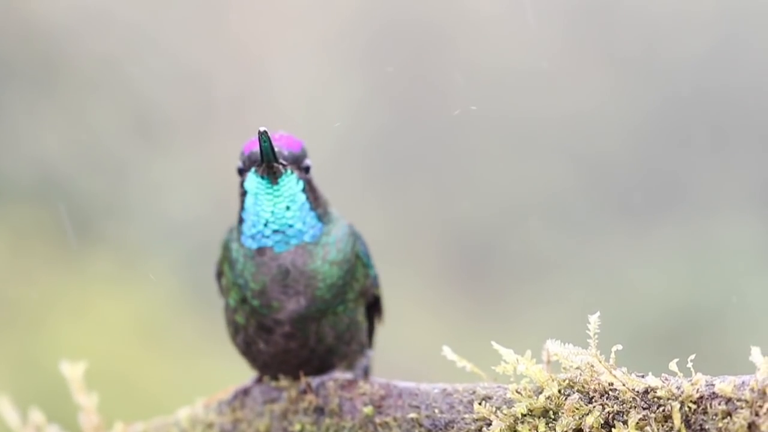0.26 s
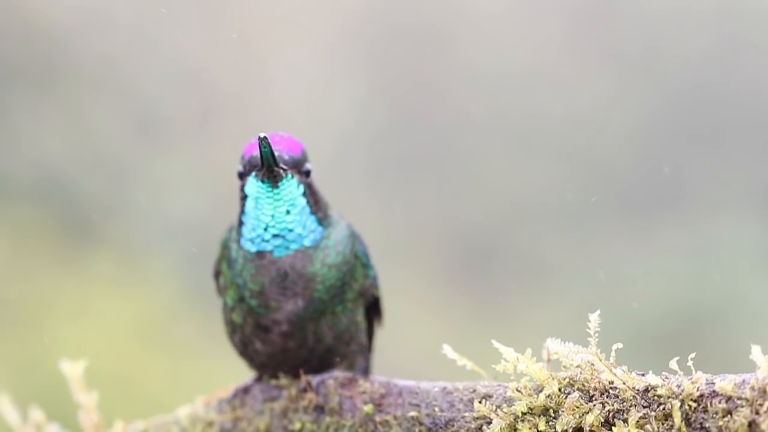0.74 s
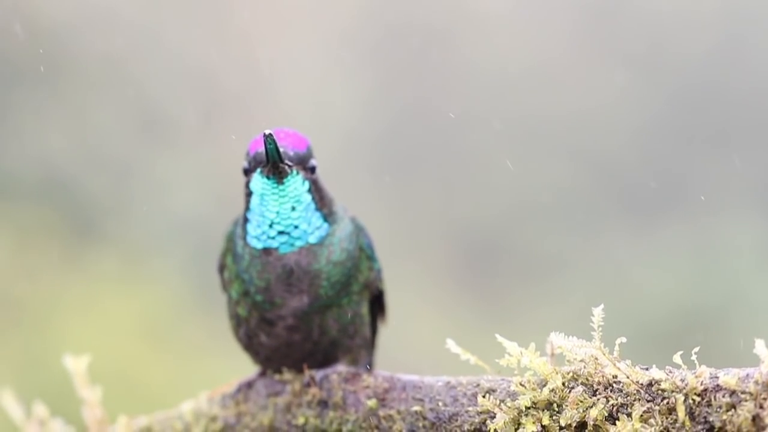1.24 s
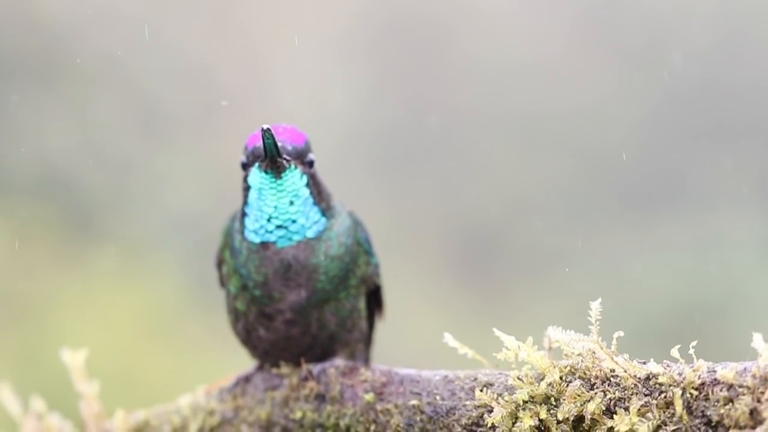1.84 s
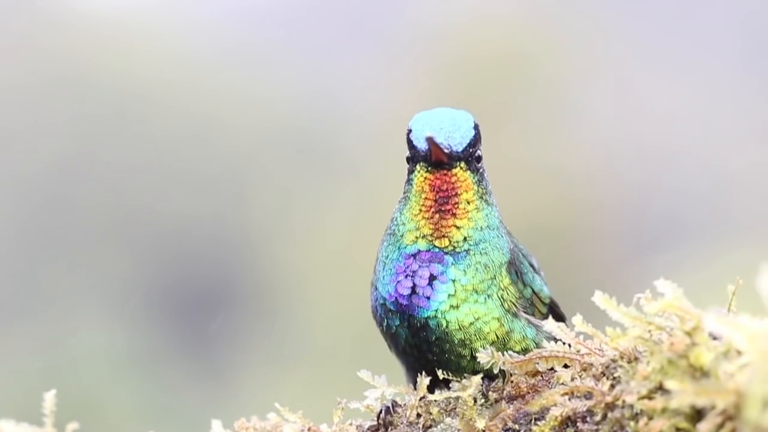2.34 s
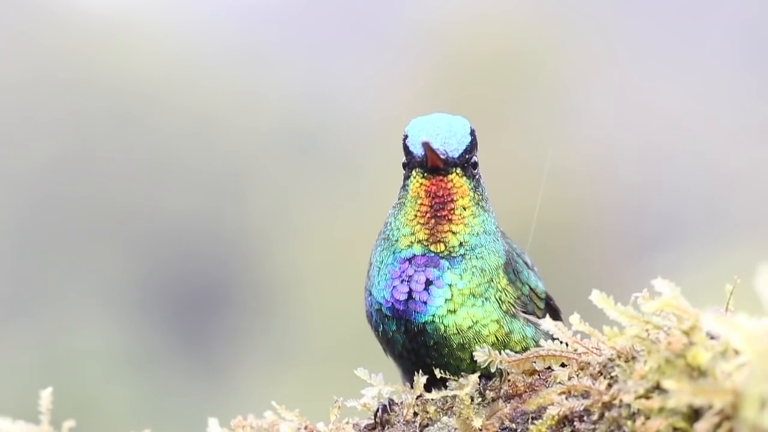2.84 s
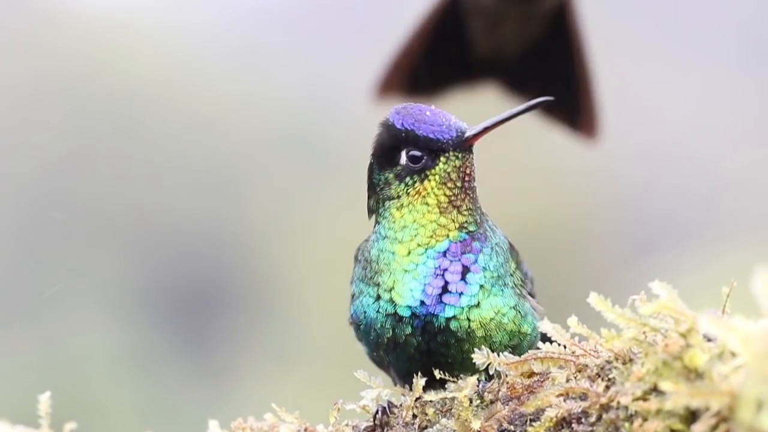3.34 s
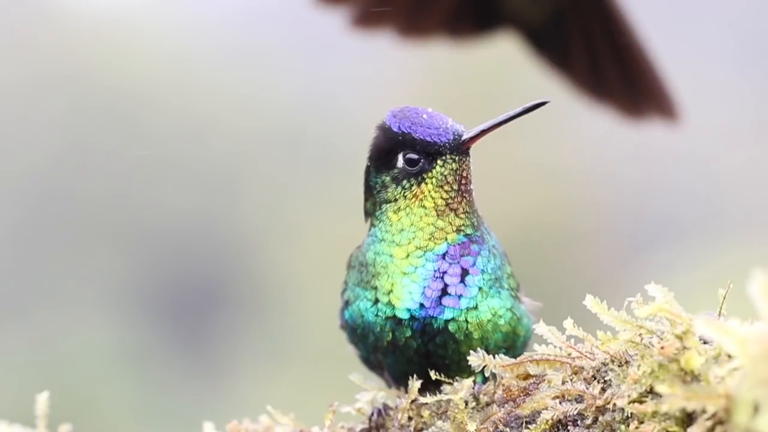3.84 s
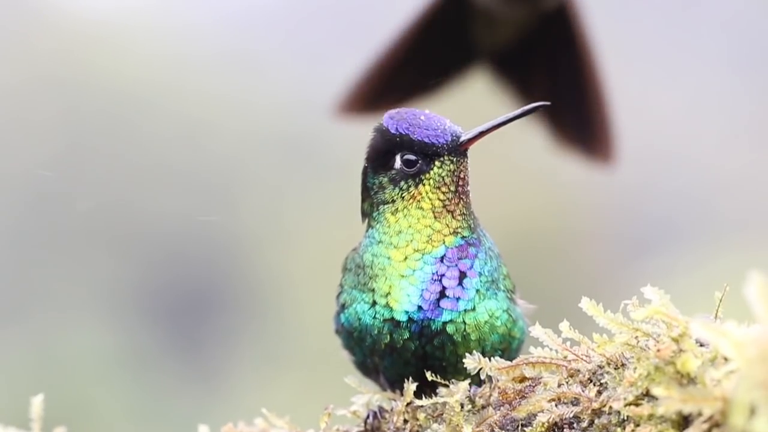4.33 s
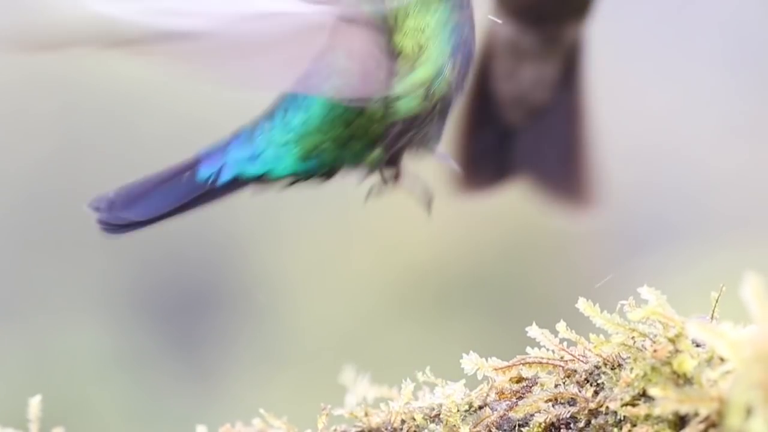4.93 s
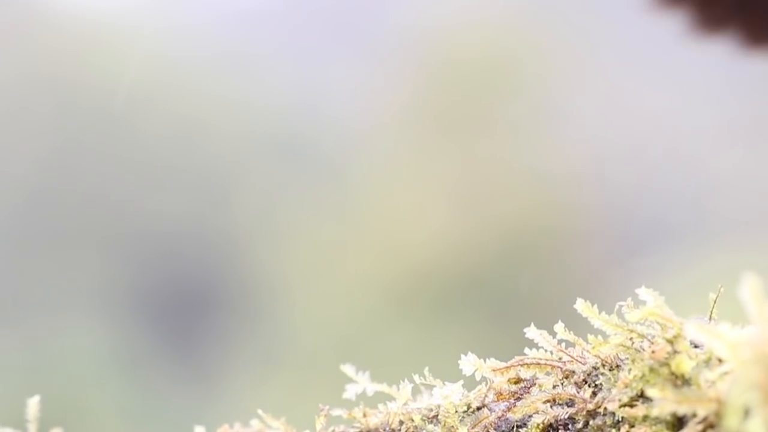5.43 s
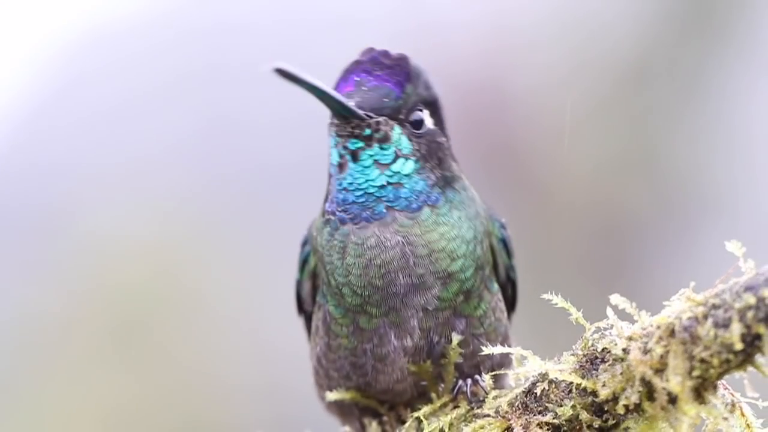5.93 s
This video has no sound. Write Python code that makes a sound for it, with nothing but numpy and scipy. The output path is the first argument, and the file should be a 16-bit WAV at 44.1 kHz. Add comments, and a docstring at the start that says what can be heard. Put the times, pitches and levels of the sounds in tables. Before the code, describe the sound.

Steady forest rain hisses and patters while big drips smack nearby leaves and small birds chip and whistle faintly far off.

```python
"""Steady rain in a forest, heard from under the canopy through a spaced pair of microphones.
From the start far drops merge into a hiss, nearer ones patter, and a distant small bird chips faintly.
Close by, big drips from the canopy smack single leaves and spray, thickest in the first two seconds.
From about 3 s a second far bird whistles now and then. The hardest drip lands at 4.7 s, to the left,
and a quick run of whistles comes just before the end."""
import sys
import numpy as np
from scipy import signal
from scipy.io import wavfile
from scipy.ndimage import uniform_filter1d

SR = 44100
rng = np.random.default_rng(int(sys.argv[2]) if len(sys.argv) > 2 else 0)


def dump_mix(stems):
    """Bounce the given channels to the path in sys.argv[1] as a 16-bit WAV at rate SR."""
    frames = np.atleast_2d(stems).T  # one column per channel
    limited = np.clip(frames, -1, 1)  # hard clip at full scale
    pcm = np.round(limited * 32767).astype(np.int16)
    wavfile.write(sys.argv[1], SR, pcm)


N = 272538


def from_db(db):
    """Decibels to gain."""
    return 10 ** (np.asarray(db) / 20)


def unit_rms(x):
    """Scale to unit rms."""
    return x / np.sqrt(np.mean(x ** 2) + 1e-20)


def unit_peak(x):
    """Scale each channel to unit peak."""
    return x / np.max(np.abs(x), axis=1, keepdims=True)


def unit_onset(x):
    """Scale each channel to unit rms over its first 5 ms."""
    return x / np.sqrt(np.mean(x[:, :SR // 200] ** 2, axis=1, keepdims=True))


def at_hz(table, hz):
    """Read a spectrum table on a log-frequency axis."""
    table_hz, values = np.transpose(table)
    return np.interp(np.log(hz), np.log(table_hz), values)


def pan(db):
    """Microphone gains for a sound that is db louder on the left."""
    return from_db([[db / 2], [-db / 2]])


def drift(rate_hz):
    """Slow random wander of unit rms."""
    pole = np.exp(-2 * np.pi * rate_hz * 40 / SR)      # one step every 40 samples
    slow = signal.lfilter([1], [1, -2 * pole, pole * pole], rng.standard_normal(N // 40 + 2002))[2000:]
    return np.interp(np.arange(N) / 40, np.arange(len(slow)), unit_rms(slow))


def ring(clicks, hz, cycles, zeros=(.5, 0, -.5)):
    """A click rings a leaf, dying by 60 dB in so many cycles; by default a thin one, without bass."""
    decay = from_db(-60 * hz / (cycles * SR))
    angle = 2 * np.pi * hz / SR
    return signal.lfilter(zeros, [1, -2 * decay * np.cos(angle), decay * decay], clicks + 1e-18)


def add(out, sound, start_s):
    """Mix a short sound in at a given time."""
    i = round(start_s * SR)
    out[:, i:i + sound.shape[1]] += sound[:, :N - i]


# A small bird far off to the left, repeating one chip: (time [s], level [dB])
BIRD_CHIPS = [(0.019, -49), (.967, -49), (1.462, -49.5), (2.972, -51), (3.5, -52), (4.21, -48),
              (4.809, -50), (5.172, -50.5), (5.725, -47.5)]
# A second far bird, whistling level notes:
# (time [s], length [s], pitch [Hz], level [dB], left over right [dB])
BIRD_WHISTLES = [(3.18, 0.042, 2346, -55, -4), (3.352, 0.075, 3140, -50.5, 0), (4.78, 0.027, 3160, -48, 4),
                 (5.68, 0.022, 3465, -46.5, -5), (6.044, .022, 2760, -48, 0),
                 (6.058, 0.046, 3160, -44.5, 0), (6.087, 0.062, 3356, -47.5, 1), (6.145, .05, 3300, -55, 1)]


def far_birds(echo_db, echo_s):
    """Raspy whistles, smeared by echoes from the trunks; a chip drops fast in pitch and levels off."""
    chip_s, chip_first_hz, chip_last_hz, glide_s, chip_pan_db = 0.027, 4624, 4050, 0.0054, 4
    chip_rasp_hz, whistle_rasp_hz = 110, 45      # how far the pitch wavers
    notes = [(s, chip_s, chip_first_hz, chip_last_hz, chip_rasp_hz, db, chip_pan_db)
             for s, db in BIRD_CHIPS]
    notes += [(s, length_s, hz, hz, whistle_rasp_hz, db, pan_db)
              for s, length_s, hz, db, pan_db in BIRD_WHISTLES]
    out, waver = np.zeros((2, N)), drift(130)
    for s, length_s, first_hz, last_hz, rasp_hz, db, pan_db in notes:
        progress = np.linspace(0, 1, round(length_s * SR))
        glide = (first_hz - last_hz) * np.exp(-progress * length_s / glide_s)
        rasp = rasp_hz * np.roll(waver, -round(s * SR))[:len(progress)]
        phase = 2 * np.pi * np.cumsum(last_hz + glide + rasp) / SR
        envelope = np.sqrt(2 * np.sin(np.pi * progress).clip(0))
        add(out, pan(pan_db) * from_db(db) * envelope * np.sin(phase), s)
    t = np.arange(SR // 5) / SR
    trunks = rng.standard_normal((2, len(t))) * np.exp(-t / echo_s)
    trunks = from_db(echo_db) * trunks / np.sqrt(np.sum(trunks ** 2, axis=1, keepdims=True))
    return out + signal.fftconvolve(out, trunks, axes=1)[:, :N]


# Colour of the rain on the forest all around: (frequency [Hz], relative density [dB])
RAIN_SPECTRUM = [(15, -28), (25, -9), (76, 1), (152, -14.5), (248, -3.5), (352, -1.5), (513, -4),
                 (1010, -3.5), (1280, -5), (3130, -1.5), (4450, -3.5), (5980, -8.5), (10500, -9.5),
                 (13400, -12), (15800, -23.5)]
# How alike the far rain is at the two microphones: (frequency [Hz], correlation [0-1])
HISS_CORRELATION = [(60, 0.79), (180, 0.083), (550, 0.057), (1650, 0.23), (4970, 0.091), (15000, 0.32)]
# Which way the far rain leans: (frequency [Hz], left over right [dB])
HISS_BALANCE = [(60, 2), (15000, -0.5)]


def far_hiss(swell, patchy_db):
    """Far drops blur into third-octave bands of noise; spray makes all but the bass swell together."""
    out, edges = 0, 20 * 2 ** (np.arange(30) / 3)
    white = rng.standard_normal((2, 2, N + SR // 4))      # a run-in lets the filters settle
    for k, (low, high) in enumerate(zip(edges, edges[1:])):
        bandpass = signal.butter(3, [low, high], "band", fs=SR, output="sos")
        mid, side = signal.sosfilt(bandpass, white[k % 2])[:, -N:]
        hz = np.sqrt(low * high)
        alike = at_hz(HISS_CORRELATION, hz)
        band = np.sqrt(1 + alike) * mid + np.sqrt(1 - alike) * side * [[1], [-1]]
        band[1] = np.roll(band[1], 3 * (hz < 7200))      # duller rain reaches the left microphone first
        spray = swell[int(hz > 5500)] / (1 + (400 / hz) ** 2)      # droplets are too small to make bass
        gain = from_db(at_hz(RAIN_SPECTRUM, hz) + patchy_db * drift(19.0)) * np.sqrt(1 + spray)
        out = out + gain * pan(at_hz(HISS_BALANCE, hz)) * band
    power = uniform_filter1d(np.mean(out ** 2, axis=0), size=2000)
    return out / np.sqrt(np.median(power))


def patter(drops_per_s, spread_db, cycles):
    """Nearer drops land at random on leaves of all sizes, all around; each rings briefly."""
    out, leaves_hz = np.zeros((2, N)), np.geomspace(450, 13000, 22)
    sizes = from_db(spread_db * np.minimum(rng.exponential(1, N), 3)) * rng.choice([-1, 1], N)
    clicks = sizes * (rng.random(N) < drops_per_s / SR)
    bearing, leaf_hit = rng.uniform(0, np.pi / 2, N), rng.integers(0, len(leaves_hz), N)
    left = clicks * np.cos(bearing)
    right = np.roll(clicks * np.sin(bearing), 9)      # the microphones are spaced apart
    for k, hz in enumerate(leaves_hz):
        hits = np.array([left, right]) * (leaf_hit == k)
        colour = from_db(at_hz(RAIN_SPECTRUM, hz)) * hz ** 1.7      # lifts small leaves: they ring less
        out += colour * ring(ring(hits, hz, cycles), hz, cycles)
    return unit_rms(out)


# Showers of droplets that some drips shake off the nearby foliage: (time [s], level [dB])
DROPLET_SHOWERS = [(1.0571, -59), (1.1108, -66), (1.1464, -53.5), (1.8745, -53), (2.5223, -52),
                   (3.546, -54.5), (3.61, -55), (4.6822, -56), (5.2401, -56.5), (5.885, -51.5),
                   (6.0564, -51.5)]


def spray_swell(rise_s, fall_s, base_db, tick_share):
    """Power that droplets and echoes add to the hiss, dull and bright; a level of base_db counts as 1."""
    bursts = np.zeros((2, N))
    for s, smack_db, _, _, _, tick_db, _ in CANOPY_DRIPS:
        spray_db = -56.5 + 0.23 * (smack_db + 35) - base_db      # a harder smack throws more spray
        bright_db = tick_share * (tick_db - smack_db + 14.5)      # a bright tick also sprays brightly
        bursts[:, round(s * SR)] += from_db([spray_db, spray_db + bright_db]) ** 2
    for s, db in DROPLET_SHOWERS:
        bursts[:, round(s * SR)] += from_db(db - base_db) ** 2
    t = np.arange(SR // 4) / SR
    envelope = (1 - np.exp(-t / rise_s)) * np.exp(-t / fall_s)
    return signal.fftconvolve(bursts, envelope[None], axes=1)[:, :N].clip(0)


# Strength of the rain's hiss at the microphones: (time [s], level [dB])
RAIN_LEVEL = [(0.0, -43), (2.2, -42.5), (2.44, -43.5), (6.18, -43.5)]


def steady_rain(patter_over_hiss_db):
    """Rain on the surrounding forest: far hiss and nearer patter share one almost even level."""
    times, levels_db = np.transpose(RAIN_LEVEL)
    level = from_db(np.interp(np.arange(N) / SR, times, levels_db))
    swell = spray_swell(rise_s=0.0014, fall_s=0.014, base_db=-56.5, tick_share=0.35)
    far = far_hiss(swell, patchy_db=1.3)
    nearer = patter(drops_per_s=300, spread_db=3.5, cycles=14.0)
    return level * (far + from_db(patter_over_hiss_db) * nearer)


# Big drips from the canopy onto single leaves close to the microphones: (time [s], smack peak [dB],
# leaf pitch [Hz], ring length [cycles], thud onset [dB], tick onset [dB], left over right [dB])
CANOPY_DRIPS = [(0.0699, -26.5, 3320, 4.7, -46.5, -46, -4), (0.1765, -45, 3250, 3, -41.5, -62, 11),
                (0.1795, -44, 2500, 2.5, -60, -62, 10), (0.219, -38, 2800, 4, -65, -48, 5),
                (0.3568, -43, 3500, 4, -50, -44, 2), (0.3745, -46, 2500, 4, -66, -40, 6),
                (0.475, -34, 3500, 3, -46.5, -39, 4), (0.5185, -61, 2430, 4, -48, -65, -5),
                (0.5508, -36, 3300, 6, -65, -62, -8), (0.5571, -23.5, 2980, 2.2, -42.5, -43, -13),
                (0.6019, -31.5, 2550, 4.8, -65, -69, 3), (0.6393, -37, 3180, 3, -44, -51, 7),
                (0.6481, -36, 3000, 2.5, -60, -60, -10), (0.7138, -30, 3620, 2.6, -43, -54, -1),
                (1.045, -31, 1850, 5, -53, -62, -2), (1.0578, -26.5, 1320, 5.6, -63, -57, 6),
                (1.0712, -30, 3520, 6.5, -61, -50, -8), (1.072, -34, 3550, 3.2, -61, -52, -4),
                (1.1086, -38, 2500, 2.3, -58, -56, -12), (1.1118, -35, 2500, 2.4, -58, -37, 5),
                (1.1477, -45, 2720, 4, -43.5, -62, -3), (1.276, -53, 2800, 4, -58, -43, -0.5),
                (1.6095, -36, 2780, 4, -45, -48, -2), (1.681, -36, 2300, 4.5, -49, -49, -12),
                (1.7096, -29, 4400, 4.4, -48, -41, -4), (1.742, -36, 2000, 4, -49, -43, -3),
                (1.8745, -22.5, 1900, 2.5, -47, -63, 1), (1.8769, -26, 3450, 7, -50, -63, 6),
                (1.924, -38, 1300, 4, -47, -56, 8), (2.0017, -33.5, 1990, 4.3, -53, -55, -13),
                (2.1931, -31, 1680, 4.4, -46, -46, 5), (2.523, -25.5, 2200, 4, -61, -50, -13.5),
                (2.7616, -32, 4840, 4.5, -60, -51, 20), (2.7764, -40, 4170, 2.5, -60, -46, 12),
                (2.7784, -51, 4170, 4, -67, -39, 5), (2.8556, -32, 1970, 5.5, -69, -60, 11),
                (2.994, -38, 1620, 10, -62, -54, 7), (3.559, -34, 3060, 6.5, -64, -49, -4),
                (3.64, -38, 3350, 4, -65, -43, -1.5), (3.9979, -46, 1990, 4, -45, -68, 12),
                (4.23, -47, 2600, 4, -52, -42, 3), (4.3425, -38, 2000, 4, -47.5, -40, -2),
                (4.6823, -16.5, 3650, 7.6, -58, -47, 13), (4.6836, -34, 2770, 9, -61, -58, 22),
                (4.72, -44, 2530, 4, -48, -65, 14), (4.9938, -34.5, 3300, 12, -71, -64, -16),
                (5.1291, -31, 2310, 3, -41, -45, 1), (5.238, -43, 1750, 4, -44, -56, 21.5),
                (5.241, -30.5, 2360, 5.8, -47, -55, 17), (5.248, -29, 3390, 3.2, -52, -43, -1),
                (5.298, -34, 2200, 4, -43, -57, -2), (5.465, -51, 2390, 4, -67, -42, 10),
                (5.683, -38, 1420, 7.7, -56, -66, 12), (5.7202, -49, 2340, 4, -47.5, -62, 19),
                (5.885, -32, 3680, 4, -45.5, -55, -1), (6.0585, -35, 2240, 16, -69, -46, -2)]


def close_drips(contact, lead_s, burst_s, thud_s, tick_s, thud_pitch_ratio):
    """A drop touches, then bursts into a dying run of impacts that shakes leaf, stem and water film."""
    out, t = np.zeros((2, N)), np.arange(1500) / SR - lead_s
    touch = np.exp(np.minimum(t, 0) / (lead_s / 4))      # faint while the tip of the drop spreads
    treble = signal.butter(2, 7000, "high", fs=SR, output="sos")
    wet = signal.butter(2, 6000, fs=SR, output="sos")      # the water film dulls the blade
    for s, smack_db, leaf_hz, cycles, thud_db, tick_db, pan_db in CANOPY_DRIPS:
        impacts = rng.standard_normal((3, 2, len(t))) * touch
        impacts[:2, :, round(lead_s * SR)] = contact      # the body of the drop hits hardest
        on_blade, on_stem, on_film = impacts
        # a soft contact keeps its bass and loses its treble
        slap = ring(on_blade * np.exp(-t / burst_s), leaf_hz, cycles / 2, zeros=[1])
        # a stiff blade snaps once, a loose one rings on
        smack = signal.sosfilt(wet, ring(slap, leaf_hz, cycles))
        thud_hz = thud_pitch_ratio * leaf_hz
        push = ring(on_stem * np.exp(-t / thud_s), thud_hz, cycles=1.0)      # a soft, broad blow
        thud = ring(push, thud_hz, cycles=5.0)
        thud += 1.2 * ring(push, thud_hz * 0.5, cycles=2.5)      # the stem adds a lower mode
        tick = signal.sosfilt(treble, ring(on_film * np.exp(-t / tick_s), hz=11500, cycles=2.0))
        drip = (from_db(smack_db) * unit_peak(smack)
                + from_db(thud_db) * unit_onset(thud)
                + from_db(tick_db) * unit_onset(tick))
        add(out, pan(pan_db) * drip, s)
    return out


def scene():
    """Rain all around, drips close by and birds far off, as they reach the microphones."""
    rain = steady_rain(patter_over_hiss_db=-10.5)
    drips = close_drips(contact=15.0, lead_s=.0007, burst_s=.0024, thud_s=.0025, tick_s=.0016,
                        thud_pitch_ratio=0.27)
    return rain + drips + far_birds(echo_db=-1.5, echo_s=0.045)


def record(dry):
    """The top of the treble is cut off steeply."""
    cutoff_hz = 15950
    return signal.sosfilt(signal.cheby2(22, 60, cutoff_hz, fs=SR, output="sos"), dry)


dry = scene()
out = record(dry)
dump_mix(out)
```